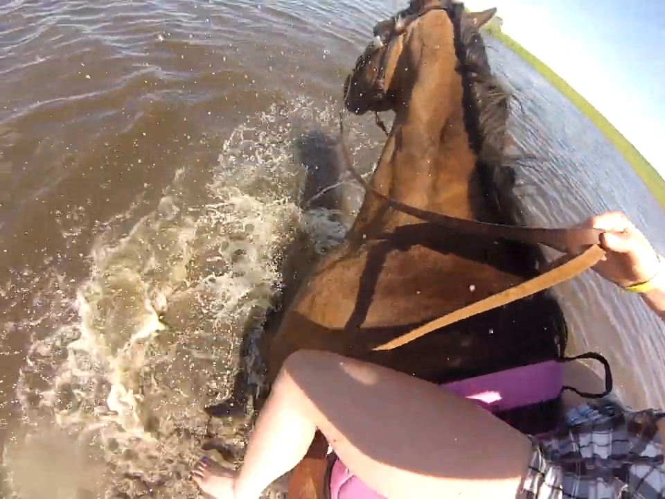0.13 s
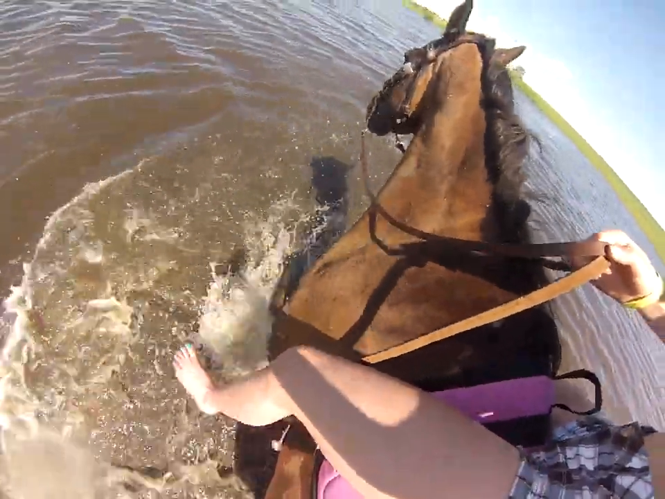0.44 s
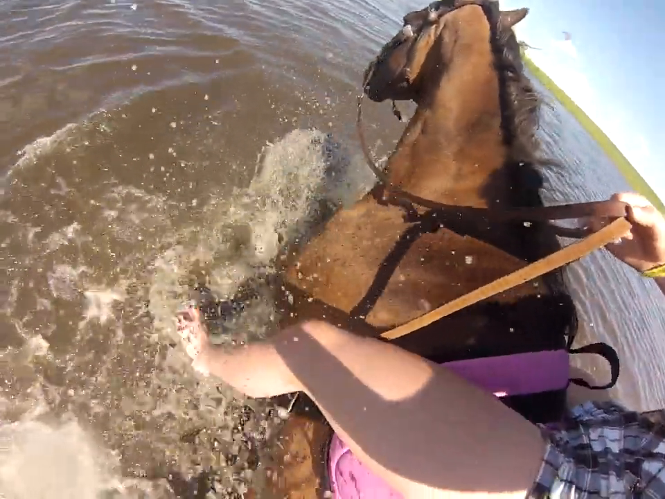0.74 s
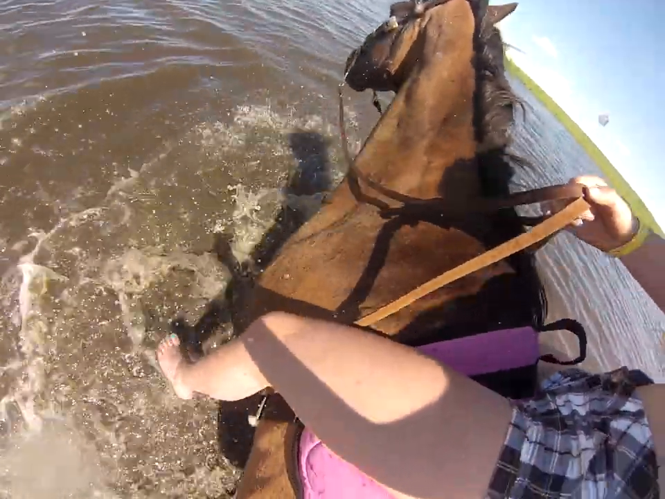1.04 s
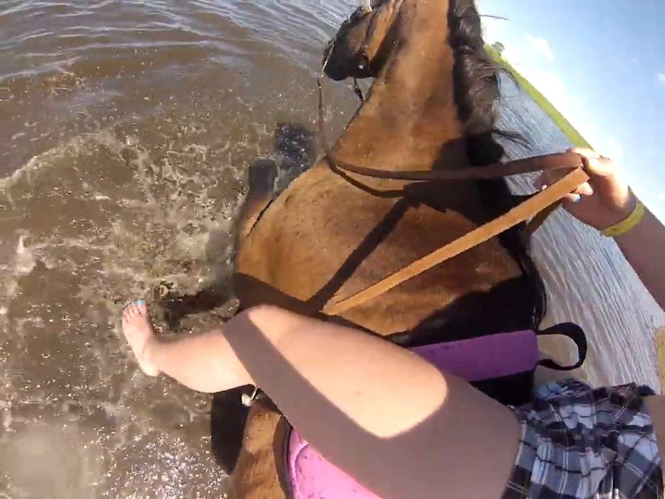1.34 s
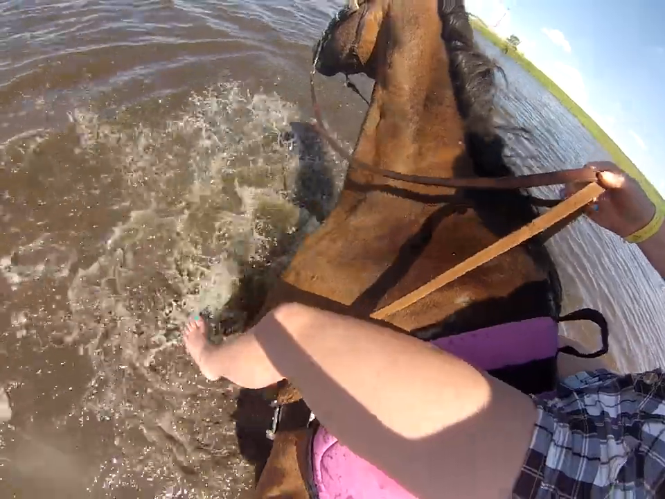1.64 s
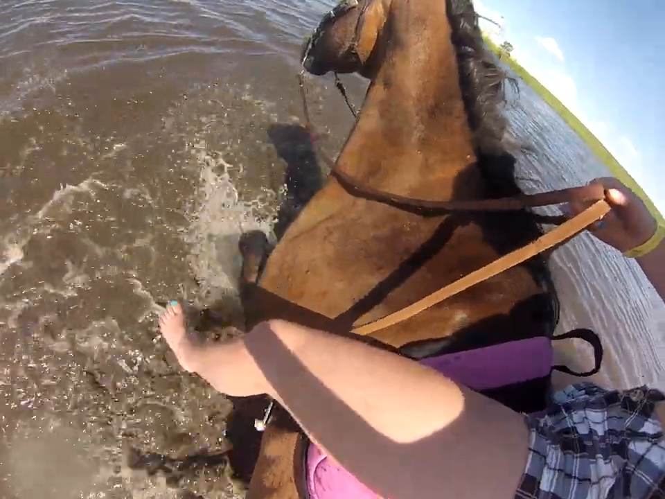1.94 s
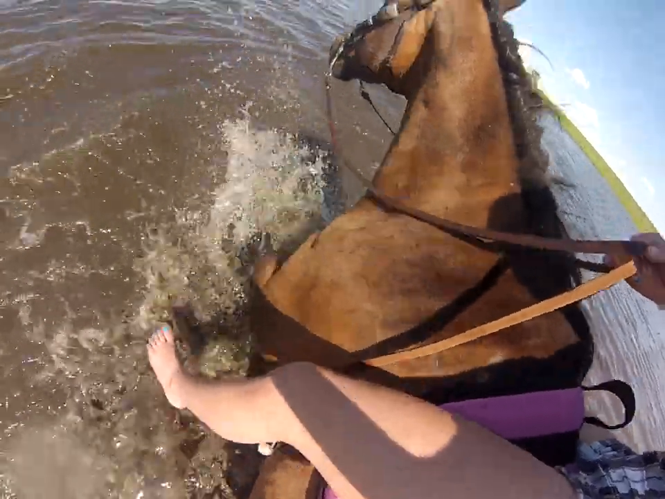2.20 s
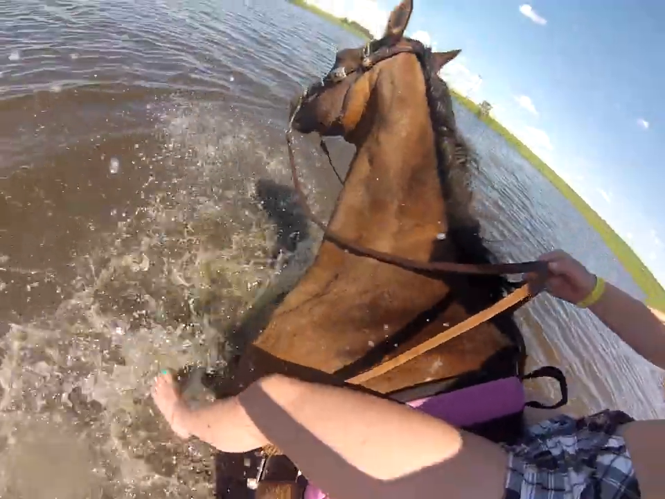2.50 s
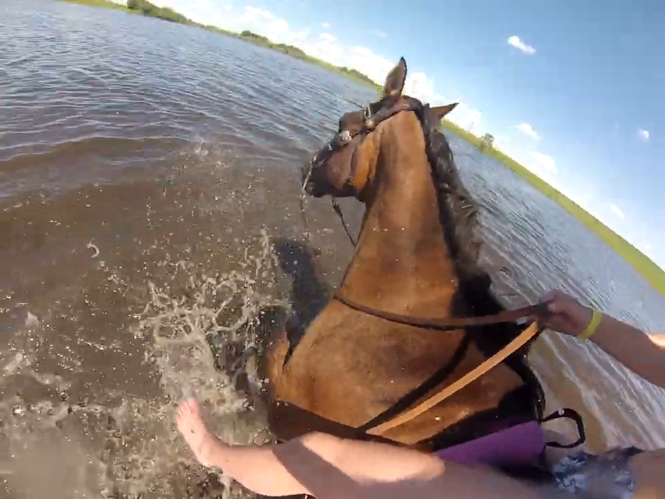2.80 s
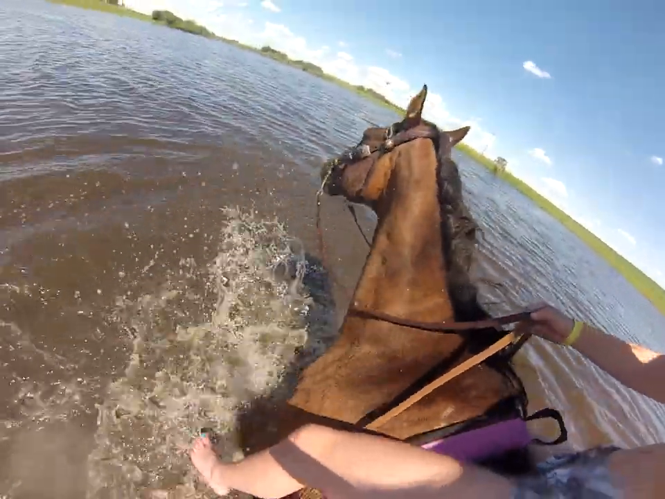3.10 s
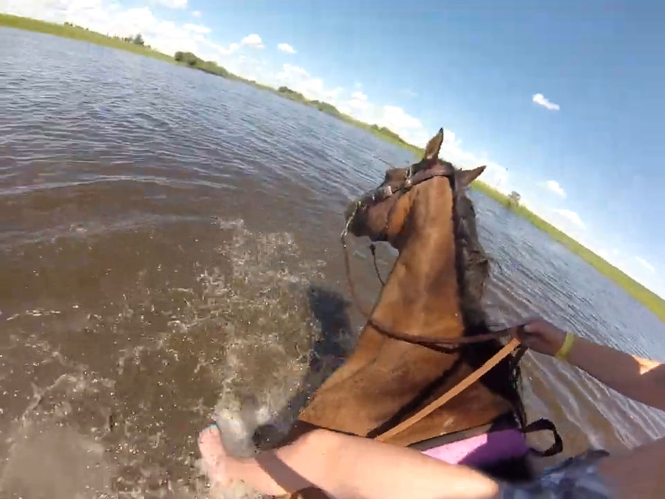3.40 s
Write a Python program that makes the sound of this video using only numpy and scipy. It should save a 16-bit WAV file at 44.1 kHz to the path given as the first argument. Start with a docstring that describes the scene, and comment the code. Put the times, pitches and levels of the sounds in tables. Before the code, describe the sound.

Rhythmic water splashes as a horse paws a lake, with gulping bubbles and dull wind rumble.

```python
"""A horse standing in a lake paws the water, heard from the saddle through a waterproof case.
Wind, made from coloured noise, rumbles on the case throughout; water laps, made from bubbles, ticks and noise.
From the start a hoof plunges about every 0.37 s: it gulps air, which glugs as large pockets ring,
and throws up a wave of bubbles and spray, from which clots and heavy drops fall back on the lake.
From 0.68 s to 2.87 s a few flying drops smack the case itself, which rings."""
import sys
import numpy as np
from scipy import signal
from scipy.fft import rfft, irfft
from scipy.io import wavfile
from scipy.ndimage import uniform_filter1d, map_coordinates

SR = 44100
rng = np.random.default_rng(int(sys.argv[2]) if len(sys.argv) > 2 else 0)


def to_wav(s):
    """Save 16-bit WAV."""
    ch = np.atleast_2d(s).T  # columns
    pcm = np.round(np.clip(ch, -1, 1) * 32767)  # PCM
    wavfile.write(sys.argv[1], SR, pcm.astype(np.int16))


N = 156555


def undb(db):
    """Turn decibels into a gain."""
    return 10 ** (np.asarray(db) / 20)


def unit(x):
    """Scale a sound to an rms (average strength) of 1."""
    return x / np.sqrt(np.mean(x ** 2))


def noise():
    """Plain hiss, equally strong at all pitches."""
    return rng.standard_normal(N)


def colour(x, points):
    """Shape the spectrum of a sound by a curve of (f/Hz, level/dB) points; rms 1."""
    hz, db = np.array(points).T
    f = np.maximum(np.arange(N // 2 + 1) * SR / N, 1)
    gain = undb(np.interp(np.log(f), np.log(hz), db))
    return unit(irfft(rfft(x) * gain, N))


def add(out, start, sound):
    """Mix a short sound in at a time in seconds."""
    i = max(int(start * SR), 0)
    out[i:i + len(sound)] += sound[:max(N - i, 0)]


def swell(crest, rise, fall):
    """A rounded rise to a crest, then an exponential fall; all in seconds."""
    t = np.arange(N) / SR - crest
    return np.exp(np.where(t < 0, -(t / rise) ** 2, -t / fall))


def swells(table):
    """Add up the swells of a table of crest, level, rise and fall."""
    return sum(undb(db) * swell(crest, rise, fall) for crest, db, rise, fall in table)


def flicker(rate, depth_db):
    """A gain that wanders at random, with a new random target `rate` times a second."""
    k = int(SR / rate)
    steps = np.repeat(rng.standard_normal(1024), k)[:N]
    return undb(depth_db * uniform_filter1d(steps, k))  # averaging turns the steps into slopes


def swarm(per_s, cycles, low_hz, high_hz):
    """Bubbles of random size, each a short ring that rises in pitch; rms 1."""
    glide = .14  # share by which the pitch rises in one life
    scatter_db = 2.7
    out = np.zeros(N)
    for when, pitch, size, length in rng.random((16000, 4))[:int(per_s * N / SR)]:
        hz = low_hz * (high_hz / low_hz) ** (pitch ** .7)
        life = cycles * (.5 + length) / hz
        t = np.arange(int(2 * life * SR)) / SR
        ring = np.sin(2 * np.pi * hz * t * (1 + glide * t / life / 2))
        ring *= np.exp(-np.e * t / life)
        # a few bubbles are much stronger than the rest
        strength = undb(scatter_db * min(-np.log(1 - size), 4)) * hz ** 0.75
        add(out, when * N / SR, ring * strength)
    return unit(out)


def patchy(x, low_hz):
    """Water falls in clumps of like-sized drops: each half octave flickers on its own."""
    spectrum = rfft(x)
    f = np.maximum(np.arange(len(spectrum)) * SR / N, 1)
    place = np.clip(2 * np.log2(f / low_hz), 0, 7)  # in half octaves above low_hz
    out = np.zeros(N)
    for k in range(8):
        band = irfft(spectrum * np.maximum(1 - abs(place - k), 0), N)
        out += band * flicker(70, depth_db=1.4)
    return unit(out)


def wind():
    """A deep rumble follows the gusts; short buffets run through it, growing less with a gust."""
    # strength of the wind (t/s, level/dB)
    gusts = [(0, -30), (.13, -35.5), (.32, -44), (.6, -40), (.95, -43.5), (1.1, -35), (1.36, -42),
             (1.55, -39), (1.671, -34.5), (1.9, -43), (2.102, -33), (2.4, -36), (2.62, -38), (2.8, -29),
             (2.95, -37), (3.28, -37.5), (3.422, -32.5), (3.55, -37)]
    # colour of the steady rumble (f/Hz, level/dB)
    rumble_colour = [(5, -1.5), (12, 5.5), (21, 2.5), (30, -11.5), (48, -12.5), (68, -19.5), (100, -25),
                     (160, -32), (300, -38.5), (1000, -68)]
    # colour of the buffets (f/Hz, level/dB)
    buffet_colour = [(30, 5.5), (60, 6.5), (100, -3), (160, -12.5), (300, -22), (1000, -79)]
    gust_db = np.interp(np.arange(N) / SR, *np.array(gusts).T)
    rumble = colour(noise(), rumble_colour) * undb(gust_db)
    buffets = colour(noise(), buffet_colour) * unit(flicker(35, depth_db=6.0))
    # -48.5 dB at a gust of -28 dB, and 0.68 dB more for each dB of gust
    buffet_db = -48.5 + 0.68 * (gust_db + 28)
    return rumble + buffets * undb(buffet_db)


def bubbles():
    """Churning water: clumps of bubbles over the noise of foam; its hollow colour wanders a little."""
    # colour of churning water through the case (f/Hz, level/dB)
    churn_colour = [(70, 9), (150, -2.5), (300, -2.5), (450, -4), (800, -1.5), (1020, -1), (1330, 3),
                    (1650, -7), (1980, -16), (2180, -3), (2360, 3), (2600, -13), (3200, -13), (5000, -38),
                    (9000, -39)]
    fizz = swarm(per_s=1700, cycles=15, low_hz=293.8, high_hz=4140) + noise()
    churn = colour(patchy(fizz, low_hz=350), churn_colour)
    # playing it at a speed that wanders by about 3 % shifts the colour up and down
    speed = flicker(14, depth_db=20 * np.log10(1.03))
    return map_coordinates(churn, [np.cumsum(speed / speed.mean())], mode="mirror")


def droplets():
    """Countless droplets tick on the lake over a fine mist; the bigger ones plink."""
    # colour of the spray through the case (f/Hz, level/dB)
    spray_colour = [(800, -1), (1900, -1), (2400, 4), (2900, 0), (3400, -3), (4000, 1), (4650, 2.5),
                    (5400, 0), (6500, 1.5), (7600, 1), (8400, -4), (10000, -6), (12000, -8.5), (14000, -13),
                    (15500, -20)]
    per_s, scatter_db = 5000, 3.2
    hits = (rng.random(N) < per_s / SR) * rng.choice([-1, 1], N)
    ticks = hits * undb(scatter_db * np.minimum(rng.exponential(size=N), 5))
    plinks = undb(-11) * swarm(per_s=170, cycles=18, low_hz=2073, high_hz=10430)
    mist = noise()
    return colour(patchy(unit(ticks) + plinks + mist, low_hz=1050), spray_colour)


def splashes():
    """Each wave of thrown water churns and sprays, then settles back to lapping."""
    # waves of thrown water (crest t/s, rise/s, fall/s, churn level/dB, spray level/dB)
    waves = [(.01, .04, 0.075, -49.5, -55), (.13, 0.088, 0.22, -49, -49.5), (.45, 0.071, 0.26, -50, -53.5),
             (.75, .04, 0.057, -52, -58), (.82, 0.031, 0.25, -48.5, -52), (.975, 0.14, 0.14, -66, -52),
             (1.14, 0.07, 0.16, -52, -56), (1.47, 0.06, 0.059, -63, -61), (1.526, 0.027, 0.15, -50.5, -58),
             (1.586, 0.03, 0.049, -64, -50.5), (1.68, 0.051, 0.2, -56, -55.5),
             (1.896, 0.098, 0.1, -48.5, -53), (2.06, 0.14, 0.16, -61, -86),
             (2.272, 0.0047, 0.025, -50, -53), (2.331, 0.022, 0.045, -52, -45.5),
             (2.40, 0.35, 0.65, -54.5, -54), (2.56, 0.025, 0.24, -51, -60),
             (2.647, 0.044, 0.048, -48.5, -53.5), (2.825, 0.032, 0.27, -53, -56.5),
             (3.06, 0.054, 0.1, -52, -52), (3.106, 0.011, 0.03, -49.5, -46.5),
             (3.168, 0.031, 0.11, -53.5, -54), (3.38, 0.093, 1, -51, -54),
             (3.443, 0.027, 0.019, -44.5, -50)]
    # powers add up, starting from the lapping between the waves
    churn_power, spray_power = undb(-61) ** 2, undb(-65.5) ** 2
    for crest, rise, fall, churn_db, spray_db in waves:
        wave = swell(crest, rise, fall)
        churn_power = churn_power + (wave * undb(churn_db)) ** 2
        spray_power = spray_power + (wave * undb(spray_db)) ** 2
    churn = np.sqrt(churn_power) * bubbles() * flicker(45, depth_db=-0.04)
    spray = np.sqrt(spray_power) * droplets() * flicker(70, depth_db=0.47)
    return churn + spray


def showers():
    """The heavy drops of a high splash patter back, each trapping a small bubble that rings."""
    # showers of heavy drops (crest t/s, level/dB, rise/s, fall/s)
    shower_table = [(.14, -52, 0.051, 0.097), (.85, -58, .05, 0.067), (.975, -57, 0.046, 0.025),
                    (1.14, -63.5, 0.074, 0.052), (2.52, -65, .05, 0.086), (3.1, -56, 0.027, .06),
                    (3.445, -49, 0.021, 0.016)]
    patter = swarm(per_s=700, cycles=12, low_hz=1700, high_hz=3220)
    return patter * swells(shower_table)


def clots():
    """A clot of water slaps back on the lake with a short splat of noise around one pitch."""
    # falling clots (start t/s, level/dB, centre f/Hz)
    clot_table = [(.529, -48, 7880), (0.588, -49, 8950), (.706, -52, 8500), (0.74, -45, 7500),
                  (.809, -43, 1290), (.972, -43, 2540), (1.599, -44, 6300), (1.942, -42.5, 4770),
                  (2.086, -48, 1980), (2.331, -39, 6200), (2.629, -38.5, 1540), (2.810, -41, 1900),
                  (2.877, -45, 9100), (3.106, -41, 3680), (3.148, -40, 1310), (3.430, -44, 7580),
                  (3.461, -38.5, 7400)]
    width_octaves, rise_s, fall_s = .17, 0.00078, 0.0024
    out, t = np.zeros(N), np.arange(SR // 20) / SR
    f = np.maximum(np.arange(len(t) // 2 + 1) * SR / len(t), 1)
    for start, db, hz in clot_table:
        band = 1 / (1 + (np.log2(f / hz) / width_octaves) ** 2)
        splat = unit(irfft(rfft(rng.standard_normal(len(t))) * band, len(t)))
        shape = (1 - np.exp(-t / rise_s)) * np.exp(-t / fall_s)
        add(out, start, undb(db) * splat * shape)
    return out


def drops_on_case():
    """A drop slaps the case, cracks, pings and rings its modes; a dented wall thumps back."""
    # drops that hit (start t/s, ring level/dB, brightest f/Hz, spread/octaves, slap level/dB,
    # crack level/dB, lowest crack f/Hz, thump level/dB, ping f/Hz, ping level/dB)
    drop_table = [(.6815, -30.5, 2200, 2.15, -20.5, -27, 100, -71, 4000, -26.5),
                  (0.6926, -31, 1730, 0.67, -52, -47, 500, -54, 1650, -46),
                  (.698, -40, 2200, 2.3, -31.5, -51, 300, -61, 3000, -46),
                  (2.2833, -38, 1700, 1, -35, -44, 100, -43, 2300, -53),
                  (2.286, -6.5, 1670, 0.52, -47, -28.5, 100, -19.5, 5750, -26.5),
                  (2.6613, -29.5, 1700, 1.2, -25.5, -37, 100, -33.5, 2920, -44),
                  (2.668, -47, 4000, 2, -47, -43, 200, -64, 7000, -46),
                  (2.846, -17, 6320, 0.48, -80, -28, 8450, -85, 13900, -29),
                  (2.8633, -43, 5940, 0.7, -79, -56, 4000, -70, 9100, -46)]
    # modes, the pitches at which the case rings (f/Hz, level/dB, time to fall by 60 dB/s)
    case_modes = [(1190, -8.5, 0.0023), (1503, -1.5, 0.0097), (2300, -1.5, 0.014), (2800, 5, 0.0052),
                  (4000, -8, 0.012), (4730, -7.5, 0.013), (6140, -13, .007), (6960, -4.5, 0.0068),
                  (8360, -24, 0.01), (12100, 10, 0.0044)]
    # colour of the crack (f/Hz, level/dB)
    crack_colour = [(150, -14), (400, -2), (800, -1), (2000, 4), (3000, 1), (3900, 9), (4400, -41),
                    (5600, 4), (7800, -7), (11000, -12), (14000, -21), (15500, -20)]
    slap_s, crack_s, dent_s, rebound_s = 0.00011, 0.0016, 0.00064, 0.007
    ping_cycles = 3.9  # air trapped under a drop rings briefly
    out, t = np.zeros(N), np.arange(SR // 10) / SR

    def mode(hz, t60):
        """A sine that dies away."""
        return np.sin(2 * np.pi * hz * t) * np.exp(-np.log(1000) * t / t60)

    def push(crest_s):
        """A single one-sided press on the wall."""
        return t / crest_s * np.exp(1 - t / crest_s)

    thump = push(rebound_s) ** 4 - push(dent_s)
    bursts = np.array_split(colour(noise(), crack_colour), len(drop_table))
    for burst, drop in zip(bursts, drop_table):
        start, db, bright_hz, spread, slap_db, crack_db, low_hz, thump_db, ping_hz, ping_db = drop
        ring = np.zeros(len(t))
        for k, (hz, mode_db, t60) in enumerate(case_modes):
            # modes near the brightest pitch are struck hardest; neighbours start in opposite directions
            reach = 1 / (1 + abs(np.log2(hz / bright_hz) / spread) ** 4)
            ring += (-1) ** k * undb(mode_db) * reach * mode(hz, t60)
        high_pass = signal.butter(2, low_hz, "high", fs=SR, output="sos")
        crack = signal.sosfilt(high_pass, burst[:len(t)] * np.exp(-t / crack_s))
        ping = mode(ping_hz, np.log(1000) * ping_cycles / ping_hz)
        hit = undb(db) * ring + undb(ping_db) * ping - undb(slap_db) * push(slap_s)
        add(out, start, hit + undb(crack_db) * crack + undb(thump_db) * thump)
    return out


def glugs():
    """A large air pocket rings for a few cycles, rising in pitch as it nears the surface."""
    # air pockets (start t/s, level/dB, starting f/Hz)
    glug_table = [(.083, -41, 710), (.139, -45, 525), (.141, -42, 298), (.399, -36, 237), (.421, -47, 465),
                  (.741, -52, 245), (.756, -39, 550), (.763, -41, 284), (.806, -55, 686), (1.108, -44, 113),
                  (1.118, -43, 525), (1.127, -45, 272), (1.155, -39, 524), (1.509, -39, 282),
                  (1.539, -43, 384), (1.879, -40, 194), (1.890, -41, 412), (1.892, -37, 577),
                  (2.268, -38, 536), (2.531, -45, 525), (2.628, -40, 335), (3.103, -39, 745),
                  (3.409, -43, 335), (3.428, -50, 462), (3.449, -35, 540)]
    rise_s, glide_per_s, fall_cycles = 0.00095, 8, 2.1
    out, t = np.zeros(N), np.arange(SR // 8) / SR
    for start, db, hz in glug_table:
        ring = np.sin(2 * np.pi * hz * t * (1 + glide_per_s * t / 2))
        shape = (1 - np.exp(-t / rise_s)) * np.exp(-t * hz / fall_cycles)
        add(out, start, -undb(db) * ring * shape)
    return out


def plunges():
    """The leg drags air under, which breaks into a dull gulp of big bubbles."""
    # hoof plunges (crest t/s, level/dB, rise/s, fall/s)
    plunge_table = [(.075, -48, 0.014, 0.014), (0.149, -53, 0.007, 0.012), (.408, -46.5, 0.044, 0.025),
                    (.766, -53, 0.014, .014), (1.124, -49.5, 0.024, .03), (1.522, -53, .01, .025),
                    (1.892, -43.5, 0.029, 0.015), (2.272, -45, 0.0071, 0.014), (2.496, -57, 0.011, 0.023),
                    (2.636, -44.5, .008, 0.019), (2.662, -46, 0.0076, 0.0047), (3.056, -56, .008, .012),
                    (3.428, -48, 0.03, 0.015)]
    # colour of the gulp (f/Hz, level/dB)
    gulp_colour = [(60, 1.5), (120, 11), (300, 0.5), (550, -2), (900, -6.5), (2000, -6), (5000, -50)]
    pockets = swarm(per_s=900, cycles=3.8, low_hz=111, high_hz=1403)
    foam = undb(-4) * noise()
    return colour(pockets + foam, gulp_colour) * swells(plunge_table)


def scene():
    """Wind, water and drops at one microphone."""
    lake = splashes() + showers() + clots()
    hoof = glugs() + plunges()
    return (wind() + lake + drops_on_case() + hoof)[None]


def record(dry):
    """The recorder cuts everything above 15400 Hz."""
    low_pass = signal.ellip(8, .2, 80, 15400, fs=SR, output="sos")
    return signal.sosfilt(low_pass, dry)


dry = scene()
out = record(dry)
to_wav(out)
```